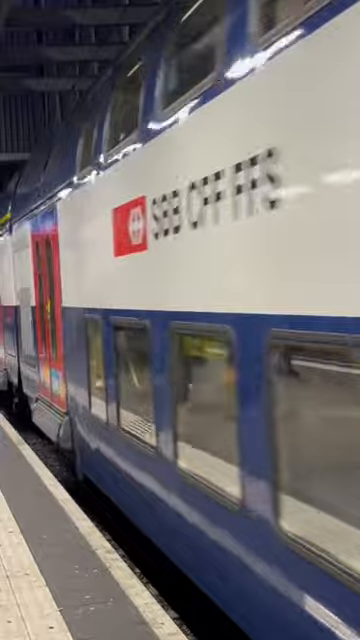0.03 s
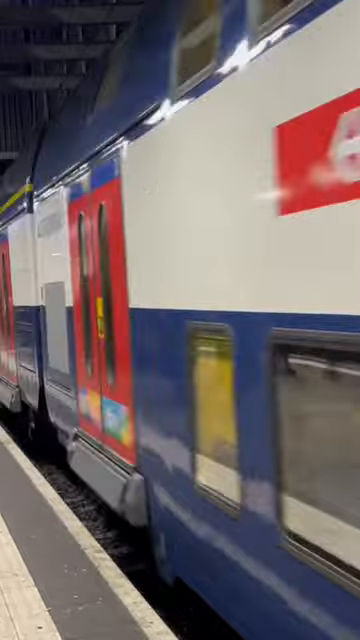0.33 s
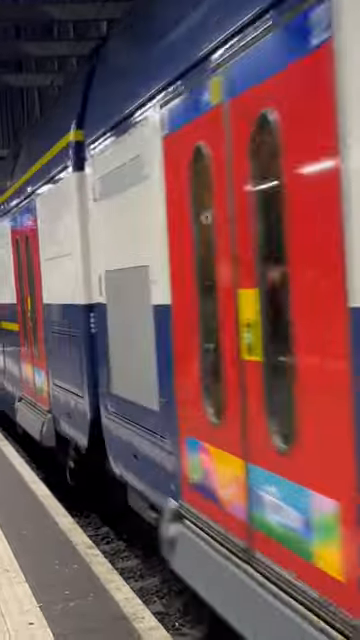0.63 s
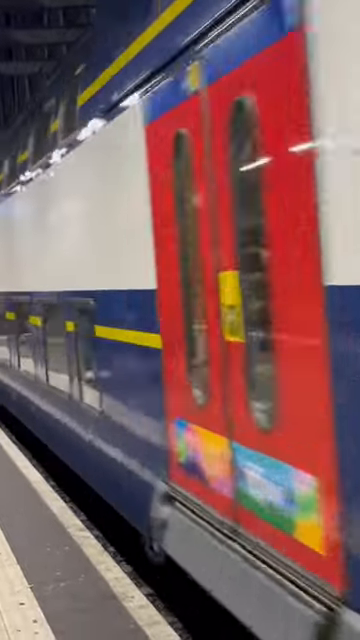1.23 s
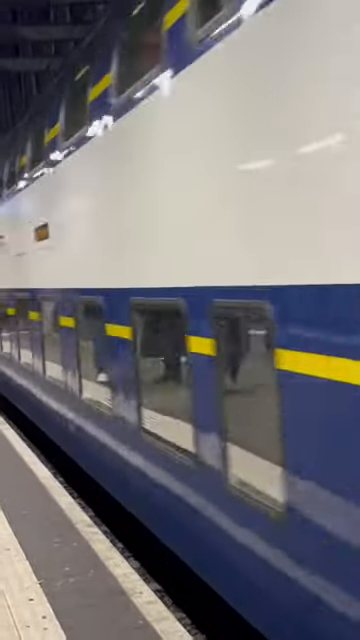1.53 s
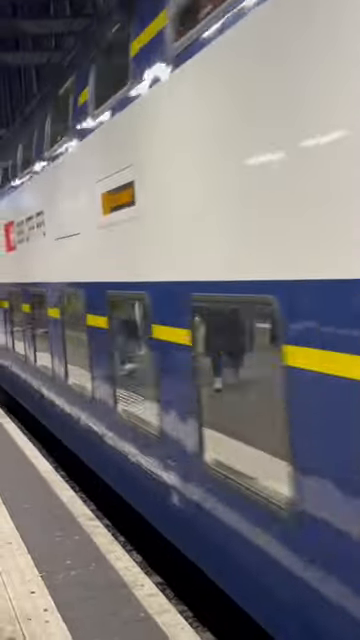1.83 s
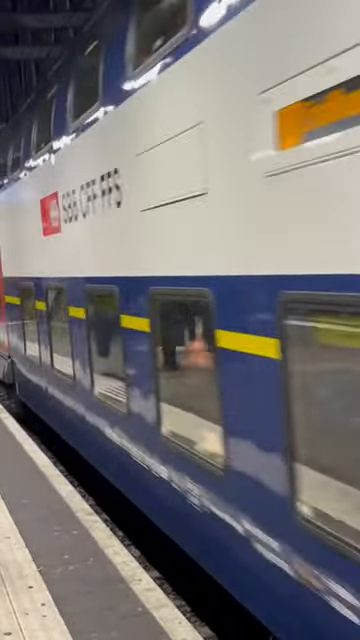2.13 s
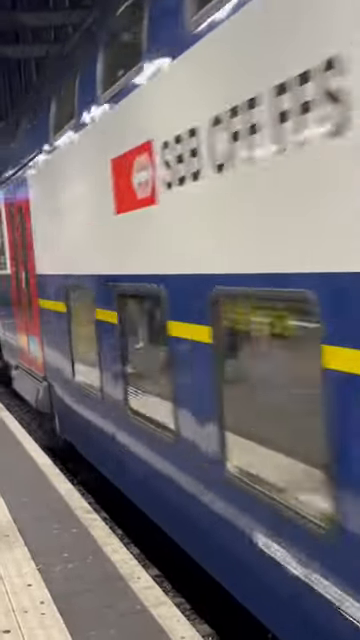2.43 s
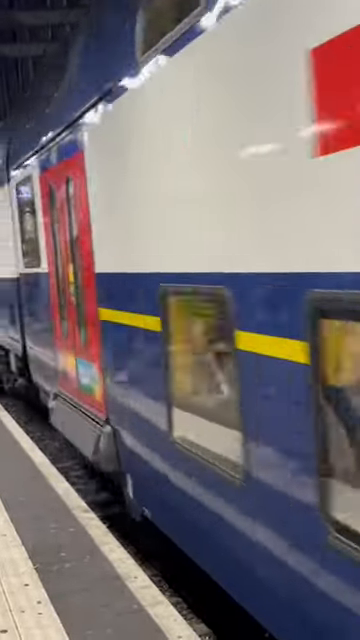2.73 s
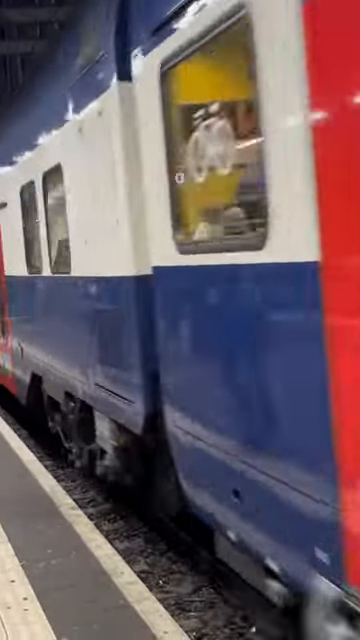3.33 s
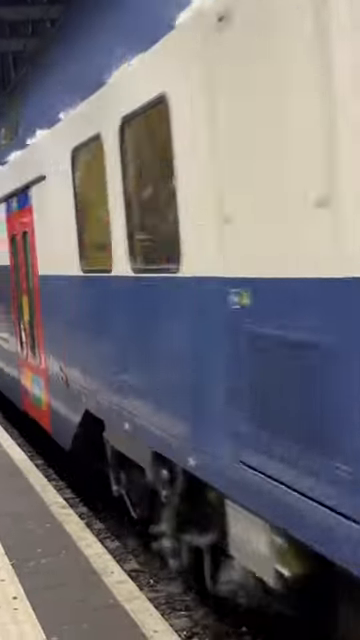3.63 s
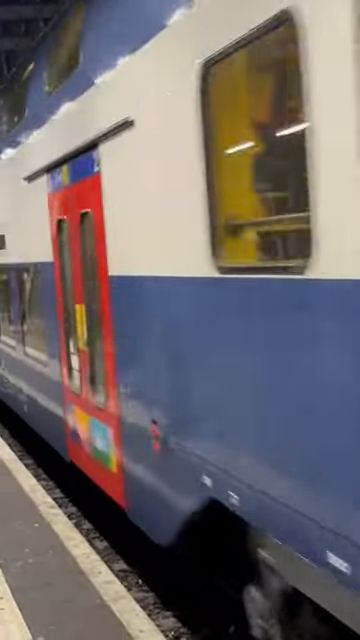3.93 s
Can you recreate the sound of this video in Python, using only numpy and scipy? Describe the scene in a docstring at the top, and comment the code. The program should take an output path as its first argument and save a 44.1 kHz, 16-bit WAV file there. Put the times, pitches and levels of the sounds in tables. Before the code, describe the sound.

A train rolls past a covered station platform, an arm's length away, with a steady rumble and dull thuds. A faint, thin squeal comes early, then the wheels swell twice with hissing, grinding and metallic ringing.

```python
"""A double-deck commuter train rolls along a covered station platform, an arm's length away.
Rough wheels on rough rails keep the cars rumbling and the track roaring; hollow panels boom.
At each gap between cars two bogies go by, hissing and grinding, their wheels ringing.
The running gear thuds now and then, and one wheel flange gives a short, thin squeal."""
import sys
import numpy as np
from scipy import signal
from scipy.fft import rfft, irfft
from scipy.io import wavfile

SR = 44100
rng = np.random.default_rng(int(sys.argv[2]) if len(sys.argv) > 2 else 0)


def pcm_store(signal):
    """Save signal as 16-bit PCM."""
    levels = np.round(np.clip(np.atleast_2d(signal), -1, 1) * 32767)
    wavfile.write(sys.argv[1], SR, levels.astype(np.int16).T)


N = 176400

# bogies going by, each at its nearest: t/s, hiss level/dB, ring level/dB
BOGIES = [(.92, -42, -39), (1.36, -39, -39.5), (3.38, -41.5, -43), (3.96, -39.5, -37.5)]


def rolling():
    """Rough wheels on rough rails: the car bodies rumble, the running gear drones, the track roars."""
    # fader curves of the three layers, ahead of their trims: t/s, level/dB
    rumble_fader = [(0, -26.5), (.7, -28.5), (1.0, -25), (1.7, -24), (2.1, -25), (2.6, -24), (2.95, -26.5),
                    (3.3, -23.5), (4, -25)]
    drone_fader = [(0, -28), (.6, -26), (1.0, -24), (1.6, -24), (2.2, -24.5), (2.5, -24.5), (3.1, -24),
                   (3.45, -23), (3.65, -22), (4, -21)]
    roar_fader = [(0, -36.5), (.4, -37.5), (.8, -35.5), (1.15, -36), (1.7, -36), (2.07, -33), (2.5, -34.5),
                  (3.0, -32), (3.5, -33), (4, -31)]
    # their spectra: f/Hz, relative level/dB
    rumble = [(15, -47), (25, -30), (32, -19), (42, -14), (53, -2.5), (66, -3.5), (80, -0.5), (105, -1.5),
              (150, -2.5), (200, -18), (320, -47), (900, -63), (4000, -120)]
    drone = [(70, -40), (140, -12), (185, 1), (225, -2), (280, 1.5), (320, -3.5), (370, -3), (450, -8.5),
             (620, -13.5), (780, -23), (1500, -30), (5000, -100)]
    roar = [(200, -40.5), (550, 3.5), (700, 4.5), (800, 2), (1000, 1), (1250, 2), (1550, 1.5), (1800, -4),
            (2300, -8), (2720, -16), (3100, -13.5), (5000, -19.5), (7500, -86.5), (11000, -83),
            (15000, -40)]
    layers = [(rumble, rumble_fader, 1.5), (drone, drone_fader, .55), (roar, roar_fader, 1.74)]
    return sum(from_db(in_time(fader) + trim_db) * coloured(tone) for tone, fader, trim_db in layers)


def wheel_hiss():
    """The contact of wheel and rail hisses, swelling and fading with each bogie."""
    # contact noise: f/Hz, relative level/dB
    hiss = [(500, -7.5), (1200, -6.5), (1800, -2), (2400, 1.5), (3150, -0.5), (3850, -4.5), (4500, -2.5),
            (5600, -6.5), (7000, -9.5), (8600, -49), (10000, -14), (11300, -18), (13000, -22.5),
            (14500, -37.5)]
    return contact_gain() * coloured(hiss)


def wheel_ring():
    """The wheels ring unevenly in their modes, swelling and sinking a little in pitch as they pass."""
    # wheel modes: f/Hz, width/Hz, relative level/dB
    modes = [(1530, 280, 1), (2060, 24, 1.5), (2283, 78, 2.5), (2580, 28, -5.5), (2885, 83, 3),
             (3460, 110, 0), (4136, 96, -1), (5310, 150, -6)]
    waver_db, waver_hz = 2.4, 11
    doppler_share = .012  # pitch rise of a far, approaching wheel
    bands = [(stereo_noise(1 / np.sqrt(1 + ((bin_hz() - hz) / (.65 * width_hz)) ** 4)), db)
             for hz, width_hz, db in modes]
    out = 0
    for nearest_s, _, ring_db in BOGIES:
        gain, approach = pass_by(nearest_s)
        ring = rms_one(sum(from_db(db + waver_db * drift(waver_hz)) * band for band, db in bands))
        playhead = (nearest_s * SR + np.cumsum(1 + doppler_share * approach)) % N
        shifted = np.array([np.interp(playhead, np.arange(N), channel) for channel in ring])
        out += from_db(ring_db) * gain ** 1.01 * shifted  # wheels radiate sideways: a touch steeper fade
    return out


def grinding():
    """Rough spots meet and set off a dense run of short steel notes, swelling with the bogies."""
    rings_per_s, attack_s, t60_s = 160, .008, .17
    low_hz, high_hz, tilt_db_per_octave = 1085.3, 2986, -5
    age = np.arange(SR // 3) / SR
    envelope = (1 - np.exp(-age / attack_s)) * from_db(-60 * age / t60_s)
    out = np.zeros((2, N + SR))
    for when, pitch, turn, spread in rng.random((rings_per_s * N // SR, 4)):
        hz = low_hz * (high_hz / low_hz) ** pitch
        gain = from_db(tilt_db_per_octave * np.log2(hz / low_hz))
        turns = np.array([[turn], [turn + (spread - .5) / 2]])  # sides up to a quarter cycle apart
        start = int(when * N)
        out[:, start:start + len(age)] += gain * envelope * np.sin(2 * np.pi * (hz * age + turns))
    return from_db(-3) * contact_gain() * rms_one(out[:, :N])  # sits just under the hiss


def wheel_flares():
    """Single wheel modes flare into brief notes that sag in pitch as the wheel goes by."""
    # flares: peak t/s, half length/s, f/Hz, width/Hz, level/dB
    flares = [(.33, 0.13, 2254, 35, -45.5), (.83, 0.037, 2060, 60, -45), (1.0, .06, 3400, 70, -50),
              (.9, .12, 4180, 80, -48), (1.13, 0.028, 1280, 140, -36), (1.3, 0.15, 2260, 40, -47.5),
              (1.33, .15, 2490, 45, -47), (1.34, .06, 2850, 160, -46), (1.32, .07, 5770, 90, -51),
              (1.35, 0.03, 1620, 347, -35), (1.47, .035, 4170, 75, -41.5), (1.5, 0.068, 1540, 55, -40),
              (1.68, 0.051, 4160, 70, -48), (1.8, 0.15, 1510, 110, -43), (2.85, 0.35, 2880, 60, -50),
              (2.85, 0.073, 1150, 39.5, -43), (3.1, 0.043, 4120, 70, -53), (3.37, 0.03, 4150, 74, -44),
              (3.37, 0.036, 3570, 60, -44), (3.45, 0.09, 1350, 110, -39), (3.88, 0.053, 1230, 110, -35),
              (3.74, .05, 3580, 40, -44), (3.91, 0.13, 3525, 40, -44), (3.88, 0.14, 6050, 95, -51)]
    return swelling_notes(flares, sag_per_s=.03)


def panel_booms():
    """Hollow car panels boom in short, low swells."""
    # booms: peak t/s, half length/s, f/Hz, width/Hz, level/dB
    booms = [(.04, 0.026, 365, 18, -30), (.5, .08, 673, 57, -36), (.85, 0.13, 372, 15, -30.5),
             (1.0, 0.037, 493, 30, -32), (1.36, 0.015, 281, 16, -22.5), (1.56, .045, 268, 41, -24),
             (1.83, .05, 273, 19, -29), (1.93, 0.05, 363, 17, -28.5), (2.13, 0.066, 372, 18, -27),
             (2.14, 0.027, 520, 63, -29.5), (2.21, 0.034, 252, 30, -24.5), (2.83, 0.13, 253, 31, -26.5),
             (3.62, 0.039, 211, 22, -22.5), (3.66, 0.042, 330, 13, -25), (3.92, 0.095, 317, 15, -22)]
    return swelling_notes(booms)


def gear_thuds():
    """Each jolt of the running gear is a dull knock and a few cycles of one low note."""
    # jolts: t/s, f/Hz, note level/dB
    jolts = [(.285, 125, -22), (.31, 90, -21.5), (.542, 95, -18.5), (.778, 104, -21), (.915, 106, -21),
             (.97, 100, -19), (1.04, 100, -15.5), (1.324, 105, -21), (1.63, 113, -23), (1.877, 85, -23),
             (2.195, 105, -21), (2.482, 115, -21), (2.77, 67, -23), (2.81, 130, -22), (2.868, 125, -22.5),
             (3.1, 186, -22), (3.105, 55, -22.5), (3.238, 104, -17.5), (3.33, 112, -20.5),
             (3.366, 115, -20), (3.478, 139, -19.5), (3.748, 117, -18.5)]
    # toneless part of a thud: f/Hz, relative level/dB
    knock_spectrum = [(40, -28), (100, -13), (170, 7), (300, 0), (500, -10), (2000, -47), (6000, -110)]
    knock = from_db(-9) * coloured(knock_spectrum)
    out = 0
    for onset_s, hz, db in jolts:
        note = np.sqrt(2) * np.sin(2 * np.pi * (hz * seconds() + rng.random()))
        out += burst(onset_s, db, rise_s=.012) * (note + knock)
    return out


def flange_squeal():
    """A flange rubbing the rail briefly locks into one high, unsteady tone."""
    # squeal pitch: t/s, f/Hz
    pitch = [(.39, 11195), (.43, 11235), (.48, 11250), (.513, 11295), (.535, 11225), (.58, 11210),
             (.63, 11170)]
    # squeal envelope: t/s, level/dB
    fader = [(.38, -76), (.405, -59), (.46, -53), (.512, -47.5), (.53, -60), (.556, -45.5), (.575, -54),
             (.62, -57), (.65, -80)]
    jitter_hz = 14
    hz = in_time(pitch) + jitter_hz * drift(rate_hz=120)
    tone = np.sqrt(2) * np.sin(2 * np.pi * np.cumsum(hz) / SR)
    gate = (seconds() > fader[0][0]) & (seconds() < fader[-1][0])
    return from_db(in_time(fader)) * gate * tone


def flange_scrapes():
    """A flange scrapes the rail in faint flicks of very high noise."""
    # scrapes: t/s, level/dB
    scrapes = [(.21, -57.5), (.585, -51), (.78, -54), (1.25, -58), (3.93, -57)]
    # friction noise: f/Hz, relative level/dB
    friction = [(4000, -32), (8500, -22), (10500, 12), (11500, 1), (13000, -5), (15000, -23)]
    return sum(burst(onset_s, db, rise_s=.022) for onset_s, db in scrapes) * coloured(friction)


def contact_gain():
    """Gain of the contact noise: the passing bogies over a floor of those further along the train."""
    far_db = -45
    near_power = sum((from_db(db) * pass_by(nearest_s)[0]) ** 2 for nearest_s, db, _ in BOGIES)
    return np.sqrt(from_db(far_db) ** 2 + near_power)


def pass_by(nearest_s):
    """Gain of a passing bogie (1 when nearest) and the share of its speed aimed at the listener."""
    speed_m_per_s, distance_m = 10.5, 3.6
    ahead_m = speed_m_per_s * (nearest_s - seconds())
    range_m = np.hypot(ahead_m, distance_m)
    return distance_m / range_m, ahead_m / range_m


def swelling_notes(rows, sag_per_s=0):
    """Noise-driven resonances that each swell once, losing the share sag_per_s of their pitch a second."""
    out = 0
    for peak_s, half_s, hz, width_hz, db in rows:
        age = seconds() - peak_s
        swell = np.exp(-(age / half_s) ** 2 / 2)
        band = stereo_noise(1 / (1 + ((bin_hz() - hz) / width_hz) ** 2))
        playhead = age - sag_per_s * age ** 2 / 2
        note = swell * np.array([np.interp(playhead, age, channel) for channel in band])
        out += from_db(db) * rms_one(note) * np.sqrt(np.mean(swell ** 2))
    return out


def burst(onset_s, db, rise_s):
    """Envelope that rises to its level and dies away."""
    age = np.maximum(seconds() - onset_s, 0) / rise_s
    return from_db(db) * age * np.exp(1 - age)


def stereo_noise(gain):
    """Unit-rms noise with the given gain per frequency, as a microphone pair picks it up."""
    # stereo image: f/Hz, left-right likeness/0-1, left lead/rad, left minus right/dB
    mic_pair = [(35, .998, -.03, 0), (70, .988, -.04, .1), (120, .97, -.13, .5), (210, .92, -.23, .8),
                (320, .88, -.47, .2), (480, .75, -.54, .6), (630, .5, -.5, -2.3), (820, .22, .58, -1.6),
                (1000, .12, -.4, -1.4), (1380, .41, -1.68, -2.3), (1600, .45, -2.42, -2.3),
                (1800, .69, .1, 3.1), (2250, .71, .34, 1.7), (2850, .59, .87, 1.7), (4100, .33, .2, 5),
                (5000, .49, .16, 5.3), (5700, .54, -1.08, 4.3), (6900, .6, -1.65, 1.7),
                (10300, .55, 1.2, 0), (11800, .9, .13, 0)]
    alike, lead, balance_db = in_hz(mic_pair)
    mid, side = rfft(rng.standard_normal((2, N)))
    sign = np.array([[1], [-1]])
    pair = np.sqrt(1 + alike) * mid + sign * np.sqrt(1 - alike) * side
    placement = from_db(sign * balance_db / 2) * np.exp(.5j * sign * lead)
    return rms_one(irfft(gain * pair * placement, N))


def coloured(spectrum):
    """Stereo noise with a tabled spectrum."""
    return stereo_noise(from_db(in_hz(spectrum)[0]))


def drift(rate_hz):
    """Smooth random wander of spread 1."""
    return rms_one(irfft(rfft(rng.standard_normal(N)) / (1 + (bin_hz() / rate_hz) ** 2), N))


def in_time(curve):
    """A curve at every sample, its points joined by straight lines."""
    return np.interp(seconds(), *np.transpose(curve))


def in_hz(rows):
    """Each column of a spectrum at every Fourier bin, joined on a log-frequency axis."""
    hz, *columns = np.transpose(rows)
    return [np.interp(np.log(bin_hz() + 1), np.log(hz), column) for column in columns]


def from_db(db):
    """Decibels to gain."""
    return 10 ** (db / 20)


def rms_one(x):
    """Scale to unit rms."""
    return x / np.sqrt(np.mean(x ** 2) + 1e-20)


def seconds():
    """Time of every sample."""
    return np.arange(N) / SR


def bin_hz():
    """Frequency of every Fourier bin."""
    return np.arange(N // 2 + 1) * SR / N


def scene():
    """The train as heard from the platform."""
    return (rolling() + wheel_hiss() + wheel_ring() + grinding() + wheel_flares()
            + panel_booms() + gear_thuds() + flange_squeal() + flange_scrapes())


def record(dry):
    """A steep low-pass takes off the very top."""
    cutoff_hz = 14300
    return signal.sosfilt(signal.ellip(10, .1, 80, cutoff_hz, fs=SR, output="sos"), dry)


dry = scene()
out = record(dry)
pcm_store(out)
```